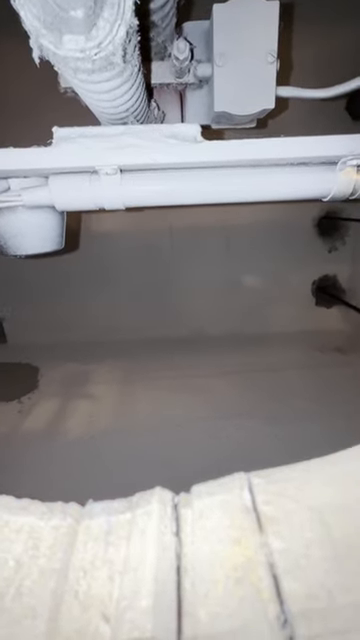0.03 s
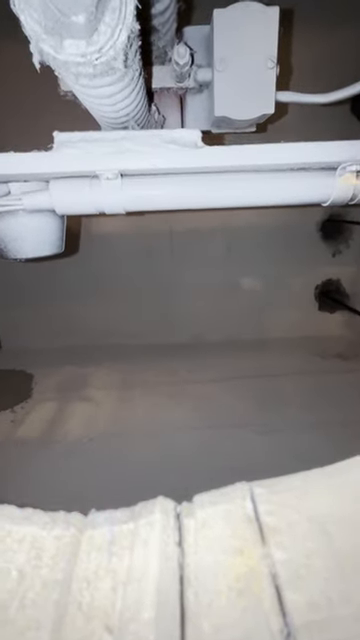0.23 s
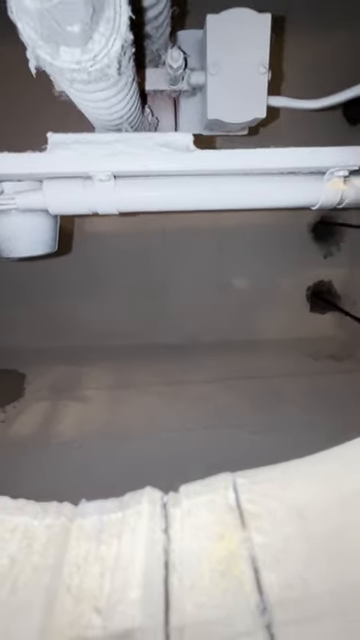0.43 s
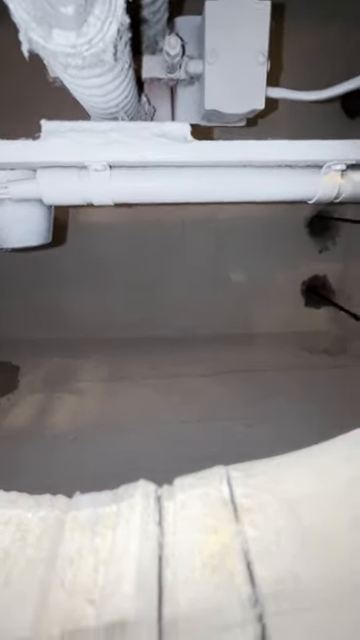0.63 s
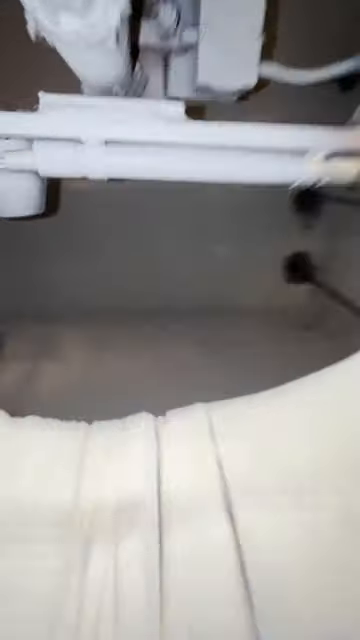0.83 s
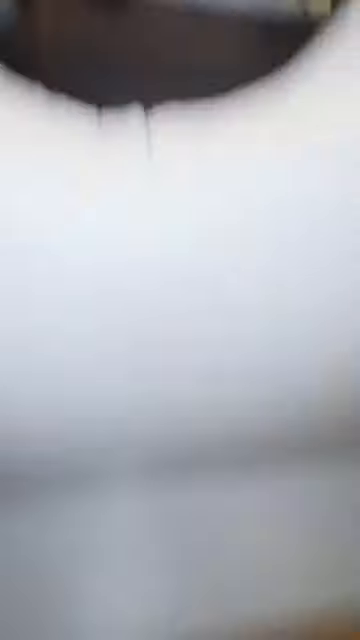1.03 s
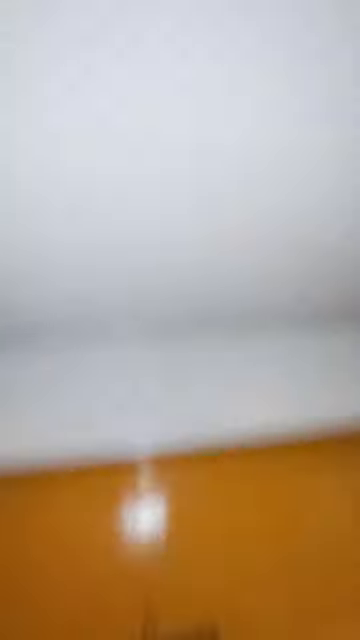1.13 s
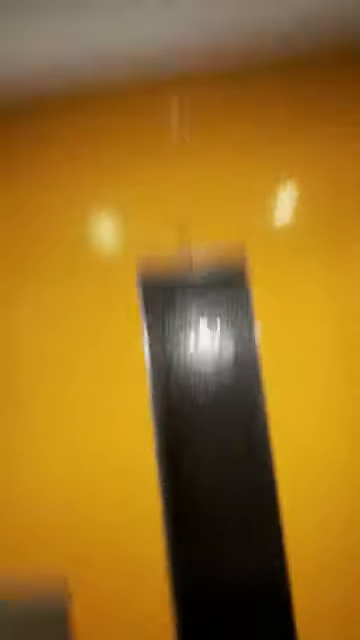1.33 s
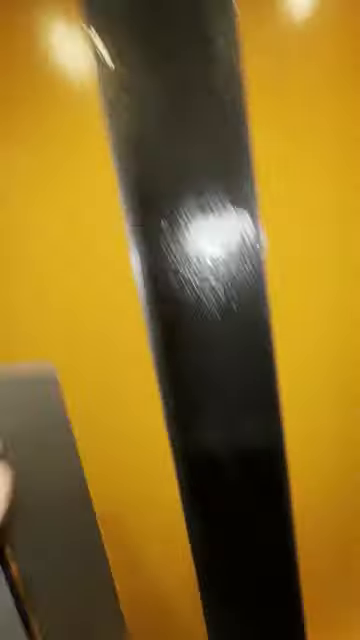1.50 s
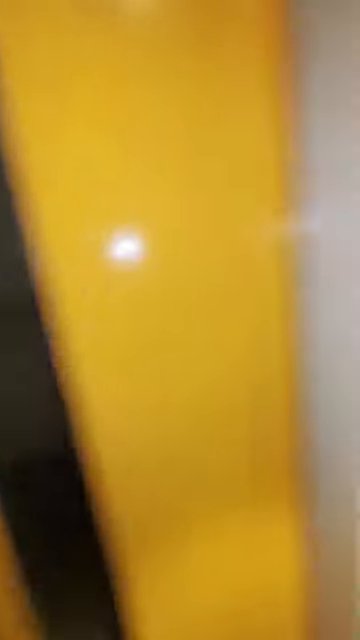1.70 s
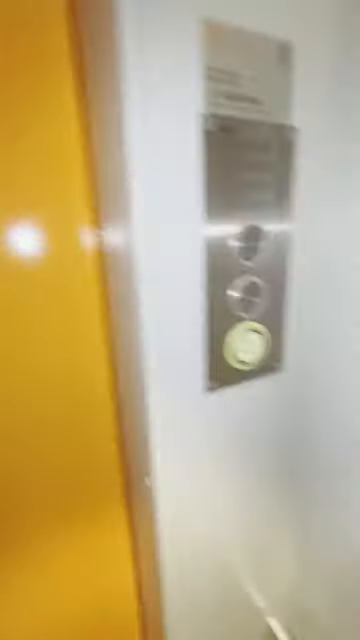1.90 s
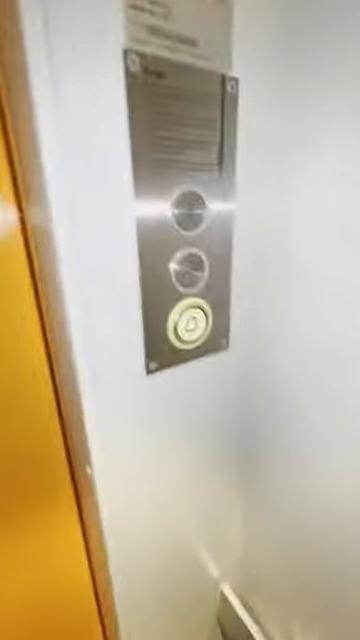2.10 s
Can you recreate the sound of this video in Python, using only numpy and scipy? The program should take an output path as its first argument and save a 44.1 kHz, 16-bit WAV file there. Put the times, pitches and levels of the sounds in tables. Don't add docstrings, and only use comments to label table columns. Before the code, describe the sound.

Elevator cabin heard from close to a wall: quiet hum, thin faint squeal, deep shuddering panel boom on the right, then steadier hiss and rubbing, with scuffs and a brighter double knock at the end.

```python
import sys
import numpy as np
from scipy import signal
from scipy.fft import rfft, irfft, next_fast_len
from scipy.io import wavfile
from scipy.ndimage import uniform_filter1d, map_coordinates

SR = 44100
rng = np.random.default_rng(int(sys.argv[2]) if len(sys.argv) > 2 else 0)


def gain_from_db(level_db):
    decades = np.asarray(level_db, float) / 20
    return 10 ** decades


def generate_wav(sig):
    pcm = np.round(np.clip(np.atleast_2d(sig).T, -1, 1) * 32767).astype(np.int16)
    wavfile.write(sys.argv[1], SR, pcm)


N = 94815
LEAD_S = 0.00049


def unit(x):
    return x / np.sqrt(np.mean(x ** 2) + 1e-20)


def curves(rows):
    times_s, *columns = np.transpose(rows)
    t = np.arange(N) / SR
    return [np.interp(t, times_s, column) for column in columns]


def wobble(rate, size=N):
    knots = rng.standard_normal(int(size * rate / SR) + 4)
    return map_coordinates(knots, [np.arange(size) * rate / SR])


def points(table):
    point_hz, level_db = np.transpose(table)

    def gain(hz):
        return gain_from_db(np.interp(np.log(hz + 1), np.log(point_hz + 1), level_db, -120, -120))
    return gain


def resonances(table):
    def gain(hz):
        total = 0
        for k, (center, width, db) in enumerate(table):
            push = 1j * hz * width
            total = total + (-1) ** k * gain_from_db(db) * push / (center * center - hz * hz + push)
        return total
    return gain


def noise(response, alike, size=N, lead_s=0):
    m = next_fast_len(size + 8192)
    hz = np.fft.rfftfreq(m, 1 / SR)
    shared, apart = rfft(rng.standard_normal((2, m))) * response(hz)
    angle = np.arccos(np.clip(alike, -1, 1)) / 2
    left = np.cos(angle) * shared + np.sin(angle) * apart
    right = np.cos(angle) * shared - np.sin(angle) * apart
    left = left * np.exp(2j * np.pi * hz * lead_s)
    return unit(irfft([left, right], m)[:, :size])


def burst(rise_s, hold_s, t60, size):
    t = np.arange(size) / SR
    rise = np.clip(t / rise_s, 0, 1)
    fading_s = np.clip(t - rise_s - hold_s, 0, None)
    return rise * gain_from_db(-60 * fading_s / t60)


def add(mix, s, x):
    part = mix[:, round(s * SR):][:, :x.shape[1]]
    part += x[:, :part.shape[1]]


def singing(table, rise_s, grain_db, pan_db):
    out, n = np.zeros((2, N)), 3 * SR // 4
    for s, hold_s, hz, waver_hz, db in table:
        wander = np.array([wobble(2 * waver_hz, size=n), wobble(2 * waver_hz, size=n)])
        pitch_hz = hz + waver_hz / 2 * wander
        tone = np.sqrt(2) * np.sin(2 * np.pi * np.cumsum(pitch_hz, axis=1) / SR)
        grain = gain_from_db(db + grain_db * wobble(150.7, size=n))
        add(out, s, grain * burst(rise_s, hold_s, 0.12, n) * tone)
    return out * gain_from_db([[pan_db], [-pan_db]])


def hum():
    # pitch_hz, level_db (per Hz)
    hum_tone = [(18, -33), (28, -14), (64, 3), (85, -2), (110, -11.5), (300, -20), (700, -27),
                (1200, -51.5)]
    level = gain_from_db(-48 + 1.5 * wobble(6))
    return level * noise(points(hum_tone), 0.32) * gain_from_db([[-1.2], [1.2]])


def boom():
    # start_s, upper_db, lower_db, lower_pitch_hz
    panel = [(0, -44.5, -40, 69.4), (.08, -42.5, -61, 73.7), (.13, -53, -57, 69.7),
             (.155, -36, -27.5, 64.5), (.2, -42, -29.5, 58.6), (.22, -11.5, -16.5, 58),
             (.25, -25, -23.5, 55.9), (.32, -13.5, -24.5, 60.76), (.36, -20, -20, 66.3),
             (.405, -26.5, -38, 63), (.445, -28.5, -18, 63.05), (.475, -18.5, -12.5, 65.8),
             (.525, -18, -25, 67.8), (.59, -22, -39.5, 66.9), (.65, -24.5, -25, 66.45),
             (.82, -30, -37.5, 65.2), (.92, -41, -36.5, 65.1), (1.02, -35.5, -38.5, 61.3)]
    ring_out = [-67, -91]
    # pitch_hz, level_db (per Hz)
    rattle_tone = [(22, -28.5), (45, 7.5), (115, 5), (200, -20.5), (420, -18), (900, -71)]
    upper_pitch_hz, far_lag_rad = 95.57, 1
    far_db, near_db = -9, 1.5

    last_s, last_upper_db, last_lower_db, last_hz = panel[-1]
    left_s = N / SR - last_s
    end = (N / SR, last_upper_db + left_s * ring_out[0], last_lower_db + left_s * ring_out[1], last_hz)
    upper_db, lower_db, lower_hz = curves(list(panel) + [end])

    out = np.zeros((2, N))
    for hz, db in (upper_pitch_hz, upper_db), (lower_hz, lower_db):
        phase = 2 * np.pi * np.cumsum(hz * (1 + 0.012 * wobble(22.0))) / SR
        level = gain_from_db(uniform_filter1d(db, size=400) + .8 * wobble(23.0))
        out += level * np.sqrt(2) * np.sin(phase - np.array([[far_lag_rad], [0]]))
    rattle_level = gain_from_db((upper_db + lower_db) / 2 - 9.5)
    rattle = rattle_level * noise(points(rattle_tone), 0.13) * gain_from_db([[-3], [3]])
    return out * gain_from_db([[far_db], [near_db]]) + rattle


def humming_parts():
    # start_s, length_s, pitch_hz, waver_hz, level_db
    low_parts = [(0, 0.11, 320, 23, -59), (0.42, 0.017, 260, 17.3, -51), (.24, 0.1, 168, 8.8, -37),
                 (.35, 0.056, 186, 18, -41.5), (.42, 0.065, 168, 11, -39.5), (.2, 0.095, 247, 14, -47.5),
                 (.255, 0.046, 292, 9.2, -55), (.43, 0.056, 258, 12, -44), (.8, 0.023, 340, 32, -50),
                 (.19, 0.021, 140, 20, -36), (1.5, 0.174, 200, 70, -55), (1.1, 0.14, 98, 12.2, -49.5),
                 (1.79, 0.094, 75, 11, -51), (1.35, 0.06, 480, 98, -56), (1.05, 0.16, 1770, 286, -57.5),
                 (1.42, 0.025, 63, 4.2, -51), (1.4, 0.047, 78, 7.1, -44), (1.4, 0.077, 60.6, 5.5, -43),
                 (1.94, 0.039, 72, 5, -43), (.55, 0.087, 174.8, 20, -50), (.8, 0.44, 351, 14.33, -57.5),
                 (1.45, 0.21, 470, 48, -51), (1.54, 0.078, 602, 38, -50), (1.25, 0.5, 1850, 500, -53.5),
                 (1.72, 0.11, 270, 4.6, -55), (1.78, 0.41, 174.8, 11.6, -55),
                 (1.95, 0.22, 350.6, 40.6, -48.5)]
    return singing(low_parts, rise_s=0.017, grain_db=2.64, pan_db=-0.14)


def hiss():
    # start_s, level_db
    slide = [(0, -95), (.07, -82.5), (.095, -57), (.22, -56.5), (.42, -61.5), (.52, -63.5), (.6, -73.5),
             (.67, -64), (.8, -61), (.9, -58.5), (.96, -52), (1.15, -55.5), (1.27, -50.5), (1.5, -52),
             (1.7, -53), (1.83, -57), (1.9, -58.5), (2.15, -58.5)]
    # pitch_hz, level_db (per Hz)
    hiss_tone = [(1600, -12.5), (2600, -7.5), (3600, -7), (4600, -7), (7400, -12.5), (9500, -9.5),
                 (11500, -19.5), (12100, -54)]
    db, = curves(slide)
    left_db, brake_left_db, brake_s = 0.5, 10, 0.43
    pan_db = left_db + brake_left_db * np.exp(-np.arange(N) / SR / brake_s)
    flutter_db = .5 * wobble(12) + 1.2 * wobble(45)
    level = gain_from_db(db + 1.5 + flutter_db + [pan_db / 2, -pan_db / 2])
    return level * noise(points(hiss_tone), -0.068)


def rubbing():
    # start_s, level_db
    rub = [(0, -75), (.08, -74.5), (.11, -52.5), (.3, -46.5), (.5, -50), (.56, -61), (.79, -59),
           (.83, -53.5), (.9, -50), (.96, -59), (1.2, -53.5), (1.38, -45.5), (1.5, -49), (1.63, -47),
           (1.7, -50), (1.9, -55), (2, -40.5), (2.15, -52)]
    # pitch_hz, width_hz, level_db
    hollow = [(351, 45, 3.5), (508, 73, -1), (625, 76, 2), (807, 101, -1), (960, 195, 0), (1363, 500, -2.5),
              (1807, 780, -7.5)]
    db, = curves(rub)
    lumps_db = .7 * wobble(15) + 2.2 * wobble(80)
    return gain_from_db(db + lumps_db) * noise(resonances(hollow), 0.34, lead_s=LEAD_S)


def squeals():
    # start_s, length_s, pitch_hz, waver_hz, level_db
    small_parts = [(.09, .08, 4550, 400, -60), (.085, .07, 4850, 150, -65), (.1, .065, 3985, 200, -63),
                   (.145, .03, 1240, 60, -63), (.1, .05, 1980, 100, -65), (.19, .05, 3985, 150, -64),
                   (.17, .065, 5950, 60, -65), (.268, .03, 5950, 60, -65), (.315, .04, 9370, 500, -65),
                   (.335, .045, 3500, 300, -65), (.2, .015, 1150, 150, -58), (.435, .02, 1150, 150, -55),
                   (.92, .06, 3800, 1200, -60), (.812, .04, 3550, 200, -63), (.811, .03, 1210, 140, -54),
                   (.815, .08, 850, 300, -57), (.31, .015, 1000, 250, -54), (.31, .008, 1550, 150, -56),
                   (.365, .008, 1150, 200, -56), (1.74, .018, 3100, 700, -55), (1.945, .04, 780, 200, -53),
                   (.74, .02, 1200, 200, -65), (.575, .04, 620, 100, -59), (1.0, .012, 930, 150, -54),
                   (.995, .015, 1270, 80, -57), (.998, .017, 2050, 250, -53), (1.35, .04, 1900, 80, -59),
                   (1.924, .01, 1270, 120, -45), (1.924, .025, 2400, 200, -50),
                   (1.94, .015, 1050, 100, -54), (1.926, .03, 1800, 400, -53), (1.924, .01, 3760, 200, -56),
                   (2.002, .04, 4800, 200, -50), (2.005, .04, 5970, 260, -58),
                   (2.005, .028, 1725, 110, -50), (2.002, .015, 4330, 300, -55)]
    return singing(small_parts, rise_s=0.00066, grain_db=2.2, pan_db=6.35)


def frame():
    # start_s, level_db, t60_s (time to die away)
    jolts = [
        (0.142, -48.5, 0.53),
        (.205, -42.5, 1),
        (0.436, -37, 0.41),
        (.51, -47, 0.85),
        (1.931, -45, 0.92),
        (2.009, -51.5, 0.99),
        (2.092, -60, 0.29),
    ]
    # pitch_hz, width_hz, level_db
    frame_modes = [(129, 9.65, -0.5), (167.4, 18.2, -0.5), (246, 37.5, -7), (309.6, 16.4, -1.5),
                   (360, 68, -15), (485, 180, -23.5), (712, 77, -16.5)]
    out, n = np.zeros((2, N)), SR // 2
    for s, db, t60 in jolts:
        ringing = noise(resonances(frame_modes), -0.23, size=n)
        add(out, s, gain_from_db(db + 4.5) * burst(0.0028, 0.0033, t60, n) * ringing)
    return out * gain_from_db([[-2], [2.2]])


def scuffs():
    # start_s, level_db, rise_s, t60_s, treble_db
    hits = [(0.247, -62.5, 0.0024, 0.18, 11), (0.309, -43.5, 0.0049, 0.059, -27),
            (0.369, -52.5, 0.0042, 0.074, -7.5), (.43, -45, 0.0039, 0.17, -16),
            (0.577, -61, 0.0012, 0.19, -21), (.811, -47.5, 0.0009, 0.28, -7),
            (.882, -57, 0.0023, 0.11, -25), (0.919, -61, 0.016, 0.44, 2), (.965, -49, 0.0035, 0.25, -19),
            (.99, -43, 0.016, 0.084, -8), (1.365, -48, 0.006, 0.11, -12), (1.46, -47, 0.012, 0.19, -1.5),
            (1.738, -44, 0.0063, 0.17, 0), (1.91, -54, .004, 0.24, -2), (1.924, -36.5, 0.00045, 0.21, -5.5),
            (2.003, -39.5, 0.00085, 0.17, -4)]
    # pitch_hz, width_hz, level_db
    knocked = [(770, 440, 1.5), (1230, 490, 5.5), (1917, 720, 1), (2167, 590, 1.5), (2500, 1100, -8.5)]
    # pitch_hz, level_db (per Hz)
    grit_tone = [(1800, -29), (2800, 0.5), (5000, -3.5), (7500, -7), (9500, -5), (11500, -21), (12300, -46)]
    out, n = np.zeros((2, N)), SR // 2
    for s, db, rise_s, t60, treble_db in hits:
        lumps = gain_from_db(2.5 * wobble(250, size=n))
        body = noise(resonances(knocked), 0.51, size=n, lead_s=LEAD_S)
        grit = gain_from_db(treble_db) * noise(points(grit_tone), 0.03, size=n)
        add(out, s, gain_from_db(db) * lumps * burst(rise_s, 0.0027, t60, n) * (body + grit))
    return out * gain_from_db([[.8], [-.8]])


def cabin(x):
    t = np.arange(SR // 3) / SR
    tail = rng.standard_normal((2, len(t))) * gain_from_db(-60 * t / 0.11)
    return signal.fftconvolve(x[::-1], tail / np.linalg.norm(tail[0]), axes=1)[:, :N]


def air(bright):
    # pitch_hz, level_db (per Hz)
    air_tone = [(10500, -32.5), (11500, -3), (14500, -11), (15300, -37.5)]
    # pitch_hz, level_db (per Hz)
    top_tone = [(13600, -30), (14000, -3), (15600, 4), (15800, -40)]
    edge = np.diff(bright, prepend=0)
    level = np.sqrt(abs(uniform_filter1d(np.mean(edge ** 2, 0), size=400)))
    opposed = gain_from_db(-18.5) * noise(points(air_tone), -1)
    alike = gain_from_db(-22.5) * noise(points(top_tone), 1)
    return level * (opposed + alike)


def scene():
    hits = scuffs() + squeals()
    hits = hits + gain_from_db(-4) * cabin(hits)
    steady = hiss()
    low = hum() + boom() + humming_parts() + frame()
    top = air(steady + gain_from_db(-7) * hits)
    return low + rubbing() + steady + hits + top


def low_pass(x):
    return signal.sosfilt(signal.butter(12, 16480, fs=SR, output="sos"), x)


def record(dry):
    # pitch_hz, level_db
    ports = [(150, 0), (380, -1), (800, 1), (2400, 1), (4400, 4), (8000, -1.5), (12000, -5.5)]
    hz = np.fft.rfftfreq(N, 1 / SR)
    port_hz, port_db = np.transpose(ports)
    tilt_db = np.interp(np.log(hz + 1), np.log(port_hz), port_db) / 2
    mix = irfft(rfft(dry) * gain_from_db([tilt_db, -tilt_db]), N)
    return low_pass(mix)


dry = scene()
out = record(dry)
generate_wav(out)
```